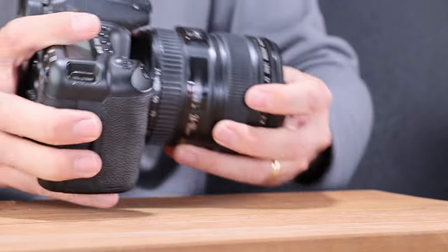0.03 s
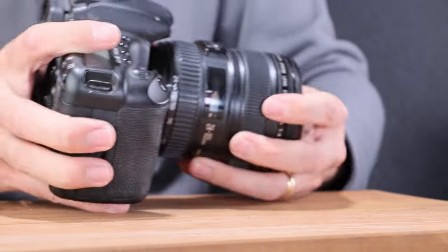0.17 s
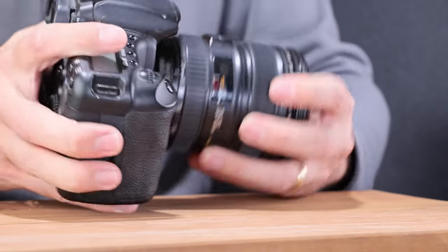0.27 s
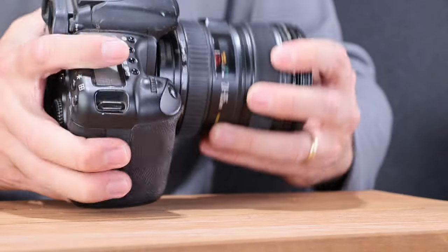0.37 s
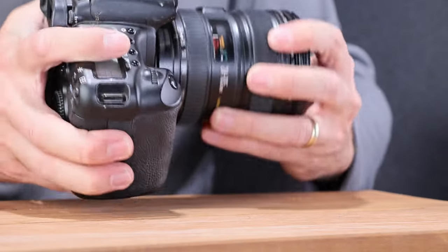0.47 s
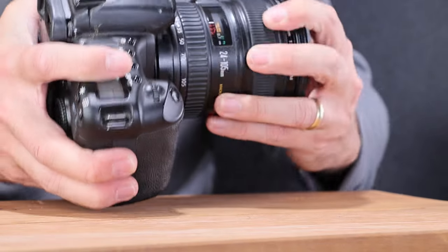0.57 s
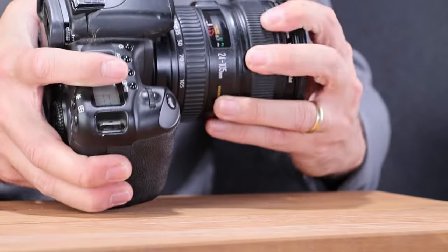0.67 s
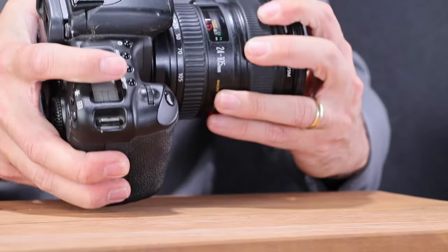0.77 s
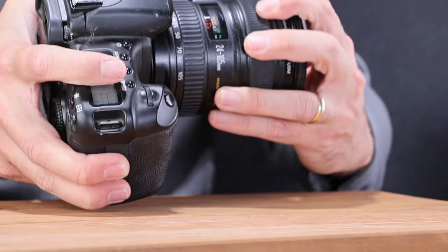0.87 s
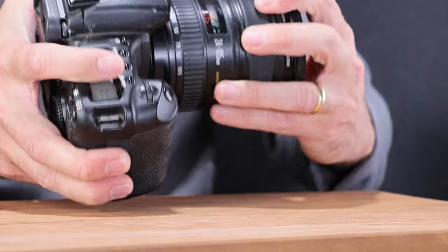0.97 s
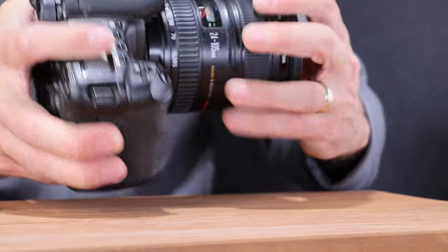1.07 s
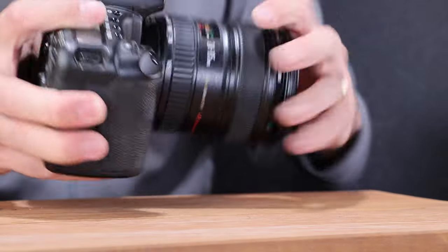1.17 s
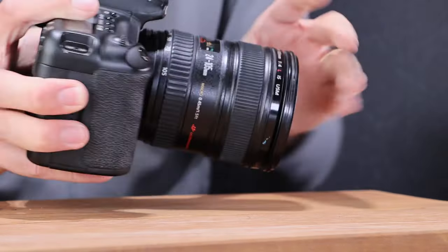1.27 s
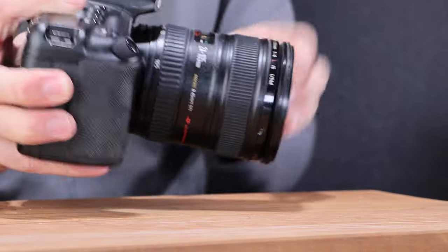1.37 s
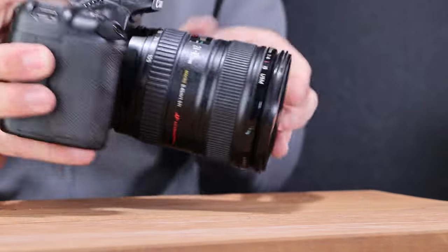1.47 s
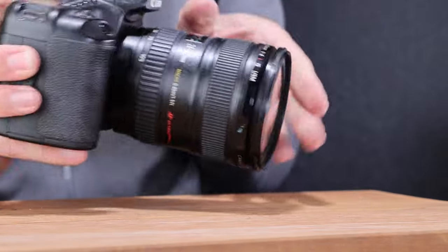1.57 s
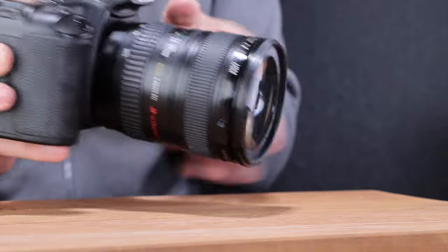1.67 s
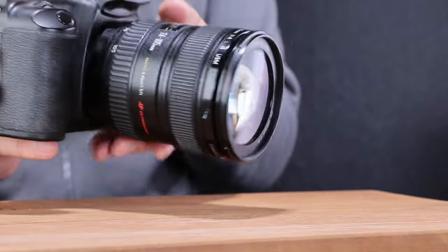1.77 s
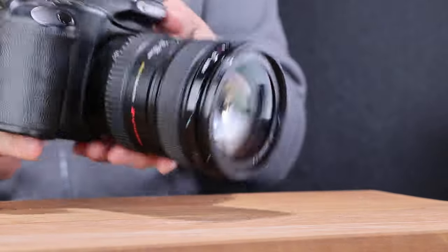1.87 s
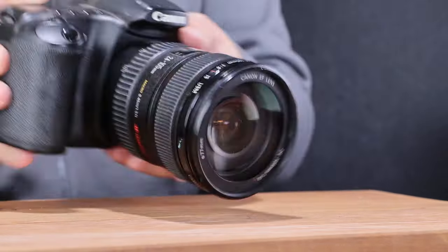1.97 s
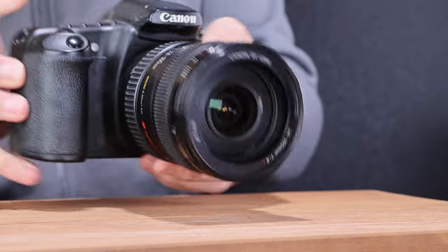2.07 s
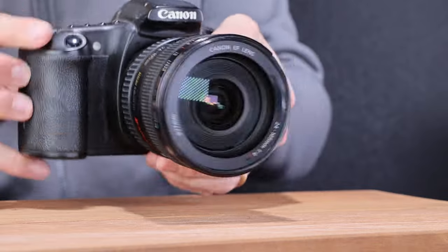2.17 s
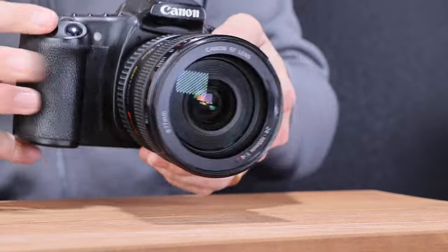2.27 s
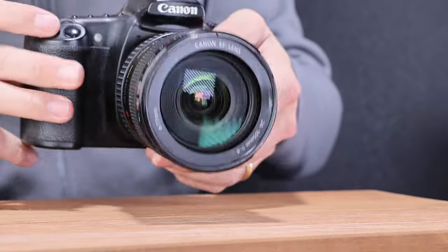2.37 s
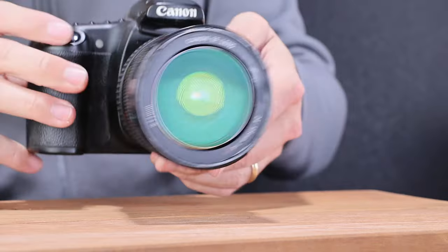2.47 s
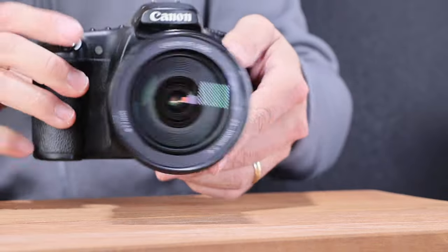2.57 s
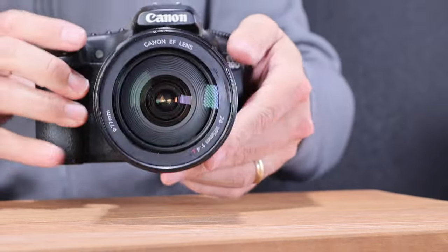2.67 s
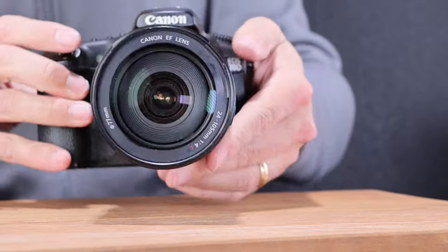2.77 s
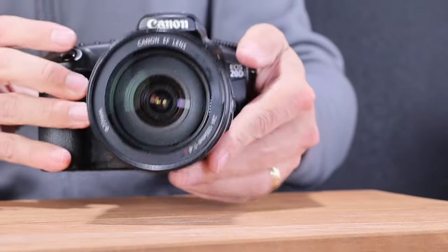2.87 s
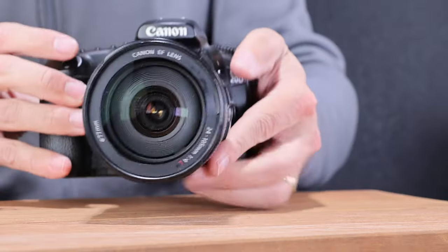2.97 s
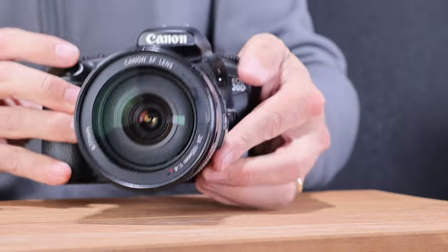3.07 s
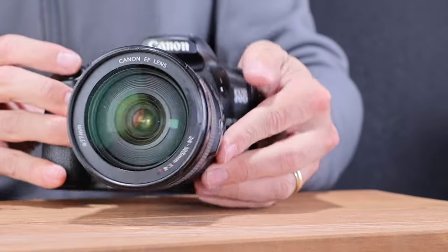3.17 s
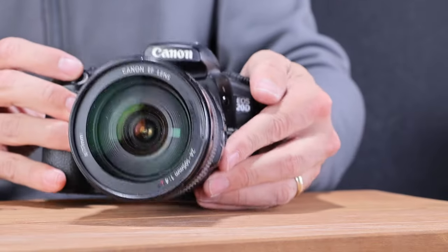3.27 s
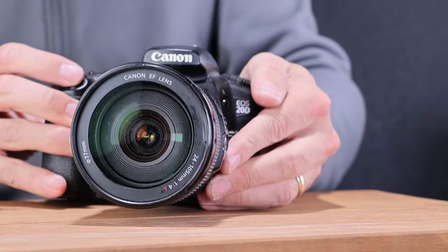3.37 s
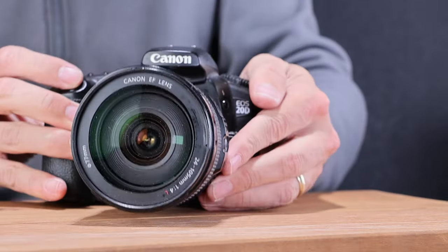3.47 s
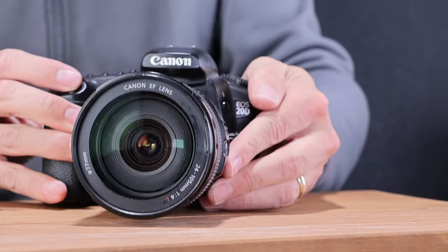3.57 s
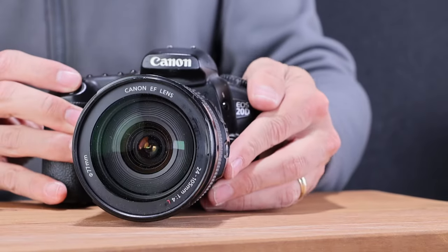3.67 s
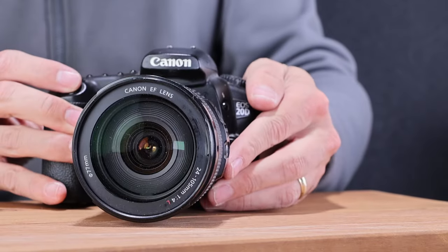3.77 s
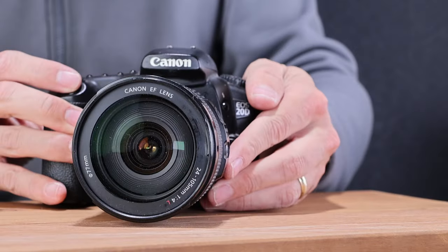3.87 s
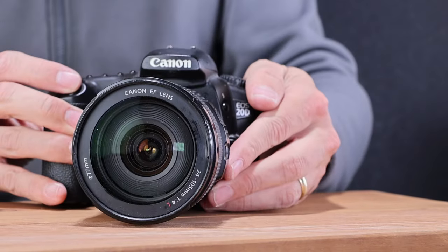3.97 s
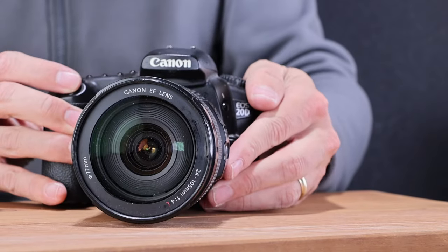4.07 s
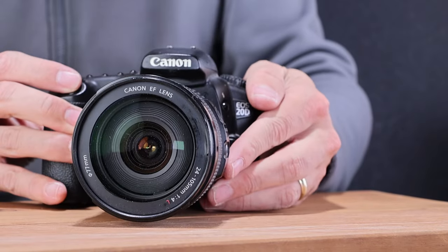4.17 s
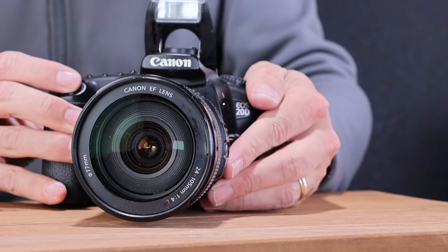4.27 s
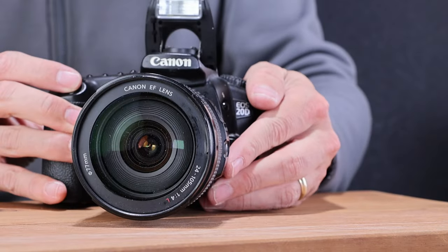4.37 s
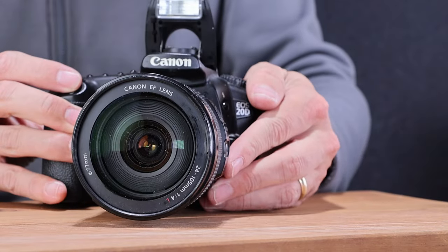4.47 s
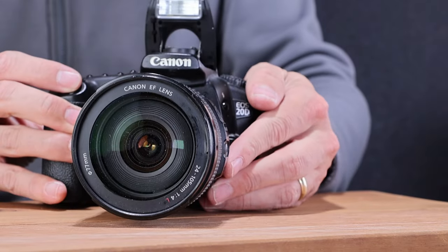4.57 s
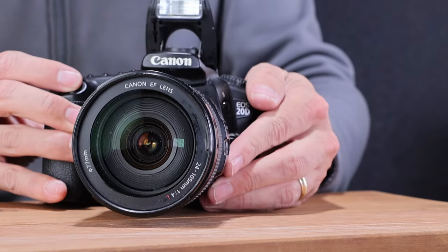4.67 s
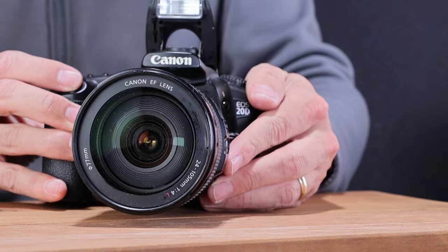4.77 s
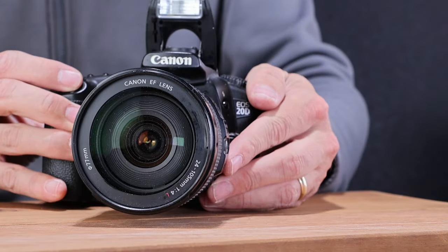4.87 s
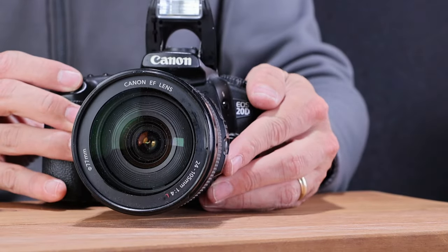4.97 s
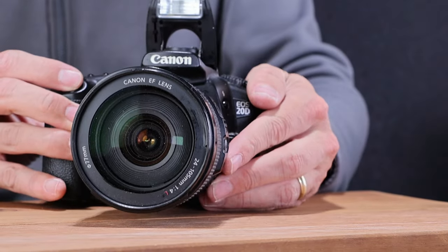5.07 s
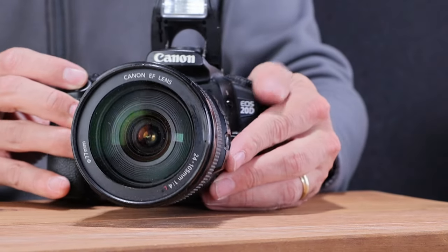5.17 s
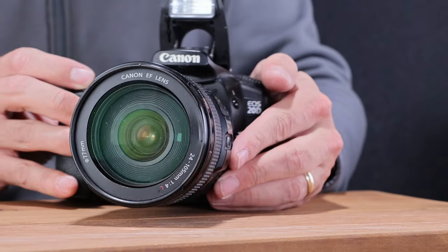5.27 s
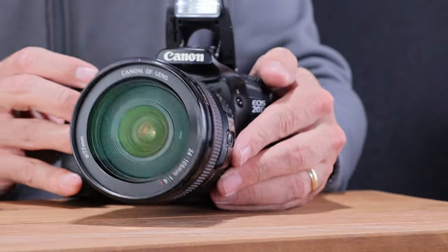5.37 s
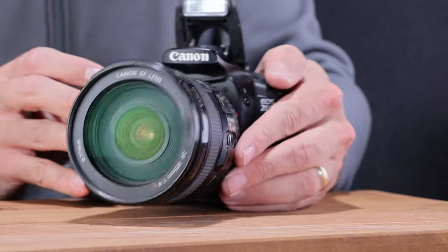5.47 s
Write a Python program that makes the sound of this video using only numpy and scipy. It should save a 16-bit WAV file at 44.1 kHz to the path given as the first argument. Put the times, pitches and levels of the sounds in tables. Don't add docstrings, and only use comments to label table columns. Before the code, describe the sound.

Soft finger rubs and dry plastic ticks come first, then a dull thump cluster and one loud sharp click. Light handling continues, with a two-part switch click, two woody table bumps as the camera lands, a quick ratcheting whir and a very sharp snap of the flash arm with a table jolt. Quiet fan hum throughout, close nearly mono microphone, short indoor reverberation.

```python
import sys
import numpy as np
from scipy import signal
from scipy.fft import rfft, irfft
from scipy.io import wavfile
from scipy.ndimage import uniform_filter1d

SR = 44100
rng = np.random.default_rng(int(sys.argv[2]) if len(sys.argv) > 2 else 0)


def generate_wav(sig):
    pcm = np.round(np.clip(np.atleast_2d(sig).T, -1, 1) * 32767).astype(np.int16)
    wavfile.write(sys.argv[1], SR, pcm)


def gain_from_db(level_db):
    decades = np.asarray(level_db, float) / 20
    return 10 ** decades


N = 244112
LEAD = 2205
BINS = 2048
BIN_HZ = np.arange(BINS + 1) * SR / (2 * BINS)
STOP_S = 4.4024
ONSET_S = .0006


def evened(x):
    return x / np.sqrt(np.mean(x ** 2) + 1e-20)


def read(points, hz):
    f, value = np.transpose(points)
    return np.interp(np.log(hz + 1), np.log(f + 1), value)


def add(mix, s, sound):
    part = mix[LEAD + round(s * SR):][:len(sound)]
    part += sound[:len(part)]


def coloured(x, points, tilt_db=0):
    hz = np.fft.rfftfreq(len(x), 1 / SR)
    gain = gain_from_db(read(points, hz) + tilt_db * np.log2(hz / 4000 + 0.043))
    return evened(irfft(rfft(x) * gain, len(x)))


def resonate(x, hz, width):
    turn = np.exp(2j * np.pi * hz * np.arange(len(x)) / SR)
    r = np.exp(-np.pi * width / SR)
    return 2 * (turn * signal.lfilter([1 - r], [1, -r], x / turn)).real


def ring(hz, db, t60, rise, length):
    t = np.arange(round(length * SR))[:, None] / SR
    x = (gain_from_db(db - 60 * t / t60) * np.sin(2 * np.pi * hz * t)).sum(1)
    x = x * (1 - np.exp(-t[:, 0] / rise))
    return x / abs(x).max()


def rattle(shape_db, length, bounce=.68):
    circle = np.log(gain_from_db(np.maximum(np.r_[shape_db, shape_db[-2:0:-1]], -100)))
    x = np.fft.ifft(np.exp(np.conj(signal.hilbert(circle)))).real
    for lag in 1 + (rng.uniform(.12, .3, 2) * length * SR).astype(int):
        b = np.r_[-min(bounce, .9), np.zeros(lag - 1), 1]
        x = signal.lfilter(b, b[::-1], x)
    return x / np.linalg.norm(x)


# (f/Hz, level/dB per Hz)
AIR_SPECTRUM = [(12, -52), (20, -11), (65, -8.5), (86, -17.5), (104, -9), (182, -6), (262, -3), (337, -5.5),
                (527, -7.5), (574, -2.5), (1220, -17), (1480, -16), (2200, -22.5), (6360, -27),
                (16000, -29.5)]
# (f/Hz, side minus mid level/dB)
AIR_SIDE_SPECTRUM = [(60, -15.5), (110, -17), (200, -20.5), (380, -20.5), (700, -20.5), (1290, -13.5),
                     (2380, -7.5), (4400, -3.5), (8120, -1.5), (15000, -0.5)]
# (f/Hz, width/Hz, level/dB re air)
DUCT_MODES = [(200, 53, -12), (342, 20, -11), (633, 36, -13.5), (700, 30, -21.5), (6260, 100, -24.5)]


def air(air_db=-63.5, edge_hz=15800, patchy_db=0.65):
    hz = np.fft.rfftfreq(2048, 1 / SR)
    a, b, c, d, patches = rng.standard_normal((N // 512 + 5, 1025, 5)).T
    patches = evened(uniform_filter1d(uniform_filter1d(patches, 20, 0), 8, 1))
    side_gain = gain_from_db(read(AIR_SIDE_SPECTRUM, hz))[:, None]
    z = np.array([a + 1j * b, (c + 1j * d) * side_gain])
    z = z * gain_from_db(read(AIR_SPECTRUM, hz)[:, None] + patchy_db * patches) * (hz < edge_hz)[:, None]
    mid, side = signal.istft(z, nperseg=2048, noverlap=1536)[1][:, :N]
    scale = gain_from_db(air_db) / mid.std()
    wind = rng.standard_normal(N)
    duct = sum(gain_from_db(air_db + db) * evened(resonate(wind, f, width)) for f, width, db in DUCT_MODES)
    return np.array([scale * mid + duct, scale * side])


# (f/Hz, t60/s)
ROOM_T60 = [(100, 0.39), (330, 0.27), (870, .34), (2300, 0.32), (6000, 0.28), (10000, 0.28), (15000, 0.16)]
# (t/s, level/dB)
NEAR_ECHOES = [(.0025, -19), (.0075, -22.5), (0.009, -19), (0.015, -12.5), (.021, -19)]


def room(x, tail_db=-0.72, side_db=-18.5):
    taps = np.zeros((2, SR // 2))
    at = np.arange(40, SR // 2 - 10, 10) + rng.integers(0, 10, (2, (SR // 2 - 41) // 10))
    np.put_along_axis(taps, at, rng.choice([-1., 1.], at.shape), 1)
    hz, t, z = signal.stft(taps, SR, nperseg=256)
    tail = signal.istft(z * gain_from_db(-60 * t / read(ROOM_T60, hz)[:, None]), SR, nperseg=256)[1]
    tail = tail * (1 - np.exp(-np.arange(tail.shape[1]) / SR / 0.00033))
    tail = gain_from_db(tail_db) * tail / np.linalg.norm(tail[0])
    for s, db in NEAR_ECHOES:
        tail[:, round(s * SR)] += gain_from_db(db)
    return signal.fftconvolve(x[None], tail * gain_from_db(np.array([[0], [side_db]])), axes=1)[:, :len(x)]


# (f/Hz, level/dB per Hz)
KNOCK_SPECTRUM = [(47, -45), (80, -31), (189, -7.5), (446, -6.5), (594, -5.5), (1340, -9), (1570, -13.5),
                  (5750, -14.5), (13000, -28.5), (15500, -37.5)]


def early_knock(near):
    add(near, -.012, gain_from_db(1) * rattle(read(KNOCK_SPECTRUM, BIN_HZ), .004))


# (f/Hz, level/dB per Hz)
RUB_SPECTRUM = [(600, -35.5), (1100, -14), (2300, -11.5), (3800, -7), (4800, -6.5), (5600, -8.5),
                (7500, -13), (14500, -22.5), (16000, -46)]


def rub(s, rise, fall, db, bright_db, lumpy_db=3.5):
    noise, lumps = rng.standard_normal((2, SR // 2))
    t = np.arange(SR // 2) / SR - rise
    grains = noise * gain_from_db(lumpy_db * evened(uniform_filter1d(lumps, 150)))
    share = np.clip(bright_db / 6 + .5, 0, 1)
    x = share * coloured(grains, RUB_SPECTRUM, 4.6) + (1 - share) * coloured(grains, RUB_SPECTRUM, -9.0)
    away = np.where(t < 0, -t / rise, t / fall)
    speed = gain_from_db(db - 14 * away)
    return s - rise, speed * x * np.clip(8 * (1 - away * (t < 0)), 0, 1)


# (t/s of fastest slide, speeding up/s, slowing down/s, level/dB, brightness/dB per octave)
FINGER_STROKES = [(.45, .14, 0.089, -62, -0.2), (.66, .08, 0.07, -61, -0.8), (1.26, .1, .12, -75, 6),
                  (1.529, 0.053, 0.03, -59, 1.5), (1.6, .05, .1, -82, 5), (2.0, .07, 0.12, -63.5, 0.3),
                  (2.15, .1, 0.054, -65, -0.3), (2.25, .1, 0.09, -78, -4), (2.62, .08, 0.12, -73, 1.5),
                  (3.05, .15, .3, -91, -3), (3.551, 0.17, 0.17, -87, -3), (3.84, .1, 0.08, -72.5, -1.5),
                  (4.05, .06, 0.086, -67, -2.4), (5.36, .1, 0.17, -68, -3.5),
                  (5.535, .07, .03, -65.5, -1.5)]


def finger_strokes(near):
    for row in FINGER_STROKES:
        add(near, *rub(*row))


# (f/Hz, level/dB, t60/s)
SHELL_MODES = [(462, -15, 0.017), (620, .5, 0.023), (674, 2.5, 0.045), (793, -9.5, 0.015),
               (961, -5.5, 0.045), (1327, 0, 0.028), (1500, -7, 0.017)]


def body(db, pitch=1):
    hz, level_db, t60 = np.transpose(SHELL_MODES)
    hz = hz * pitch * rng.uniform(0.95, 1.03, len(hz))
    return gain_from_db(db) * ring(hz, level_db, t60, 0.0014, BINS * 2 / SR)


def click(db, hz, spread, length, body_db, modes_db=4.0):
    shape_db = -6 * (np.log2((BIN_HZ + 50) / hz) / max(spread, .3)) ** 2
    ripple = evened(uniform_filter1d(uniform_filter1d(rng.standard_normal(BINS + 1), 40), 40))
    part = rattle(shape_db + modes_db * ripple, length)
    return gain_from_db(db + 14.5) * (part + 0.36 * body(body_db))


# (t/s, peak level/dB, centre f/Hz)
SKIN_TICKS = [(0.159, -51, 4900), (0.774, -58, 3800), (0.8864, -57.5, 4310), (1.014, -47, 4000),
              (1.5914, -56, 7250), (1.639, -55.5, 4230), (1.7754, -53, 4550), (2.011, -57, 4600),
              (2.106, -54, 5280), (2.166, -60, 4700), (2.3094, -61, 6260), (2.602, -62, 5080)]


def skin_ticks(near):
    for s, db, hz in SKIN_TICKS:
        add(near, s + ONSET_S, click(db, hz, spread=0.92, length=.0019, body_db=-10))


# (t/s, peak level/dB, centre f/Hz, spread/octaves, body level/dB re click)
PART_CLICKS = [(0.2453, -52, 3400, 1, -8), (0.4434, -52, 3280, 0.66, -23), (0.4848, -43, 3440, 0.8, -26),
               (1.282, -44.5, 1540, 0.56, -18), (1.489, -42, 6500, 0.85, -11.5),
               (1.5519, -42.5, 4260, 1, -19), (1.8826, -56, 2580, 1.5, -6), (1.9021, -49, 2760, 1, -4),
               (2.0572, -47, 4770, 0.5, -18), (2.063, -48.5, 5150, 0.52, -16), (2.393, -46, 3480, 0.7, -16),
               (2.4583, -52, 4750, 0.62, -5), (2.4664, -56, 1670, 0.68, -14),
               (3.6944, -55, 1500, 1.2, -3.5), (3.7314, -43.5, 3240, 1.23, -14),
               (3.7355, -48, 4500, 1.2, -10.5), (3.8876, -56, 1630, 1.07, -1),
               (5.3627, -49.5, 3710, 0.79, -6), (5.521, -56.5, 1530, 1.46, -1)]


def part_clicks(facing, spread):
    for s, db, hz, octaves, body_db in PART_CLICKS:
        tap = click(db, hz, octaves, .0015, body_db)
        add(facing, s + ONSET_S, tap)
        add(spread, s + ONSET_S, gain_from_db(-2.5) * tap)


# (f as multiple of main pitch, level/dB, t60/s)
TABLE_MODES = [(.45, -25, 0.13), (.85, -9, 0.12), (1.0, -2, 0.14), (1.14, -10, 0.2), (1.42, -2.5, 0.075),
               (1.65, -4, 0.064), (2.4, -9.5, 0.088), (3.6, -18, 0.013)]


def thump(db, hz, ring_factor):
    factor, level_db, t60 = np.transpose(TABLE_MODES)
    contact_s = max(0.00099 + .0004 * (-31 - db), .0005)
    return gain_from_db(db) * ring(hz * factor, level_db, t60 * ring_factor, contact_s, .25)


# (f/Hz, level/dB, t60/s, delay/s, swell/s)
SLAB_MODES = [(102, -10.5, 0.16, .001, .004), (172, .5, .26, .0005, .003), (207.5, 1.3, .15, .034, .008),
              (239, 4.5, .075, .0002, .001), (287.7, -5.5, 0.16, .02, 0.0054), (340, -9, .12, .0002, .002),
              (400, -12, .07, .0002, .002), (616, -11.5, 0.034, .0002, .001)]


def landing(db, hard_db, ring_factor):
    hz, level_db, t60, delay, swell = np.transpose(SLAB_MODES)
    t = np.arange(SR // 4)[:, None] / SR
    u = np.maximum(t - delay, 0)
    level_db = level_db + hard_db * np.log2(hz / 200)
    x = gain_from_db(level_db - 60 * u / (t60 * ring_factor)) * (1 - np.exp(-u / swell))
    x = (x * np.sin(2 * np.pi * hz * t)).sum(1)
    return gain_from_db(db) * x / abs(x).max()


# (t/s, peak level/dB, main f/Hz, ring time factor)
DULL_BLOWS = [
    (.8015, -46.5, 148, 0.46),
    (0.811, -37.5, 110, 1.04),
    (0.8346, -39.5, 160.4, 0.78),
    (0.862, -45, 149.6, 1.2),
    (2.181, -49, 135, 1.6),
    (3.901, -53.5, 200, 1.4),
    (5.375, -56, 186, 0.9),
    (5.412, -49.5, 184.5, 2.6),
]
# (t/s, peak level/dB, hardness/dB per octave, ring time factor)
TABLE_LANDINGS = [
    (3.4575, -35, 1.5, 0.77),
    (3.579, -36.5, -3, 0.89),
    (4.4113, -34.5, 1, 1.2),
]


def table_blows(facing, spread):
    blows = [(s, thump(*how)) for s, *how in DULL_BLOWS]
    blows += [(s, landing(*how)) for s, *how in TABLE_LANDINGS]
    for s, blow in blows:
        add(facing, s, blow)
        add(spread, s, gain_from_db(-14.5) * blow)


def snap(colour, db, length, body_db, pitch):
    shape_db = read(colour, BIN_HZ)
    shell = body(body_db, pitch)
    blurred_db = 10 * np.log10(uniform_filter1d(gain_from_db(shape_db) ** 2, 50))
    direct = gain_from_db(db) * (rattle(shape_db, length) + shell)
    return direct, gain_from_db(db - 3.5) * (rattle(blurred_db, length) + shell)


# (f/Hz, level/dB per Hz)
MOUNT_SEATING = [(180, -49.5), (300, -2), (828, -6.5), (2790, -14.5), (4670, -22), (5250, -25), (6520, -22),
                 (8220, -28), (16000, -37)]
LOCK_PIN = [(500, -9), (900, -14), (2200, -7), (3400, 1.5), (4300, 5), (5600, 4.5), (7000, -5.5),
            (10500, -9), (14000, -11), (16500, -25.5)]
SWITCH_LEAVING = [(470, -35), (800, -35), (1500, -11), (3400, -3), (4030, -9), (4680, -4), (5310, -8),
                  (6330, 0.5), (9220, -15.5), (11100, -16), (16000, -26.5)]
SWITCH_DROPPING = [(470, -32), (800, -4.5), (1520, -16), (2410, 0.5), (3650, -10.5), (4510, -2.5),
                   (5110, -5.5), (7640, -14), (8660, -8), (9570, -21), (16000, -35)]
ARM_REBOUND = [(900, -30.5), (2600, -16.5), (4900, -14), (5900, -23), (7050, -3.5), (8200, -3.5),
               (9100, -6), (11500, -11), (16000, -29)]
BUTTON_RELEASE = [(470, -54), (800, -20), (2770, -12), (5180, -1), (6740, -10.5), (8550, -24), (14500, -36),
                  (15400, -39), (16000, -62)]
# (t/s, level/dB, rattle length/s, body level/dB re snap, body pitch factor)
LATCH_SNAPS = [
    (0.8005, -22.5, 0.0013, -24.5, 1.52),
    (0.9215, -7, 0.00094, -33, 0.98),
    (2.6871, -19, .002, -21.5, 1.01),
    (2.7434, -19.5, 0.0011, -26, 0.964),
    (4.4126, -6, .0008, -18, 1.0),
    (4.948, -24.5, 0.00097, -34, 0.99),
]


def latch_snaps(facing, spread):
    colours = [MOUNT_SEATING, LOCK_PIN, SWITCH_LEAVING, SWITCH_DROPPING, ARM_REBOUND, BUTTON_RELEASE]
    for colour, (s, *how) in zip(colours, LATCH_SNAPS):
        direct, around = snap(colour, *how)
        add(facing, s, direct)
        add(spread, s, around)


# (t/s, peak level/dB, centre f/Hz)
CAM_STEPS = [
    (4.1604, -48.5, 2960),
    (4.199, -53, 3950),
    (4.2434, -37.5, 3970),
    (4.2504, -36, 3780),
    (4.344, -35.5, 2580),
    (4.3694, -53, 4670),
]


def cam_steps(near):
    for s, db, hz in CAM_STEPS:
        add(near, s + ONSET_S, click(db, hz, spread=1.1, length=.0016, body_db=-21))


# (f/Hz, width/Hz, level/dB)
HOUSING_MODES = [(1040, 120, -3), (1400, 150, -1.5), (2570, 250, -1.5), (2950, 200, -3), (4450, 220, -4.5),
                 (7250, 250, -16.5), (9280, 200, -13)]
# (f/Hz, level/dB per Hz)
GEAR_SPECTRUM = [(240, -61.5), (400, -39.5), (673, -6), (1130, -2), (1540, -3.5), (1990, -11.5),
                 (2550, -2.5), (10400, -17.5), (15500, -37.5)]
# (start t/s, length/s, whirr level/dB, change over the stage/dB)
MOTOR_STAGES = [
    (4.16, .07, -46, -17.5),
    (4.238, .1, -47, -1),
    (4.34, .059, -42.5, -3.5),
]


def motor(wash=0.58, whine_hz=3950, teeth_per_s=490):
    t = np.arange(MOTOR_STAGES[0][0], STOP_S - .003, 1 / SR)
    n = len(t)
    teeth = rng.standard_normal(n) * (0.32 + (rng.random(n) < teeth_per_s / SR) * 3.3)
    housing = sum(gain_from_db(db) * evened(resonate(teeth, hz, width)) for hz, width, db in HOUSING_MODES)
    whirr = wash * coloured(teeth, GEAR_SPECTRUM) + 0.42 * evened(housing)
    load = np.zeros(n)
    for s, length, db, change_db in MOTOR_STAGES:
        load += gain_from_db(db + change_db * (t - s) / length) * (t >= s) * (t < s + length)
    waver = 1 + .0015 * evened(uniform_filter1d(rng.standard_normal(n), 600))
    whine = np.sqrt(2) * np.sin(2 * np.pi * np.cumsum(whine_hz * waver) / SR)
    whine = whine * gain_from_db(1.2 * evened(uniform_filter1d(rng.standard_normal(n), 200)))
    u = (t - 4.213) / 0.14
    spin = gain_from_db(-56.5 - 1.5 * u) * np.clip(12 * u, 0, 1) * np.clip(6 * (1 - u), 0, 1)
    x = gain_from_db(-5.5) * uniform_filter1d(load, size=130) * whirr + spin * whine
    return t[0], x * signal.windows.tukey(n, .02)


# (f/Hz, level/dB per Hz)
FLASH_SPECTRUM = [(600, -34), (1500, -8.5), (2600, -5.5), (3300, -1), (4000, -6.5), (4800, 1), (6300, -3),
                  (7800, -4.5), (9000, -18), (10300, -16.5), (11500, -14), (16000, -34.5)]
CHATTER_TOUCHES = [1.0, 0.25, .9, 1, 0.42, .2]


def flash(db=5, room_db=-1.5, chatter_hz=3175):
    shape_db, touches = read(FLASH_SPECTRUM, BIN_HZ), np.zeros(200)
    at = np.round(np.arange(len(CHATTER_TOUCHES)) * SR / chatter_hz).astype(int)
    touches[at] = CHATTER_TOUCHES
    burst = np.convolve(rattle(shape_db, .0003, bounce=.3), touches)
    direct = gain_from_db(db) * burst / np.linalg.norm(burst)
    return direct, gain_from_db(db + room_db) * rattle(shape_db, .002)


def scene():
    near, facing, spread = np.zeros((3, N + LEAD))
    early_knock(near)
    finger_strokes(near)
    skin_ticks(near)
    part_clicks(facing, spread)
    table_blows(facing, spread)
    latch_snaps(facing, spread)
    cam_steps(near)
    add(near, *motor())
    for mix, sound in zip((facing, spread), flash()):
        add(mix, STOP_S, sound)
    mid, side = room(near + spread)
    small = signal.butter(2, 65, "high", fs=SR, output="sos")
    mid, side = signal.sosfilt(small, [mid + near + facing, side])[:, LEAD:] + air()
    side = side - .012 * mid
    return np.array([mid + side, mid - side])


def low_pass(x):
    return signal.sosfilt(signal.butter(12, 16640, fs=SR, output="sos"), x)


def record(dry):
    return low_pass(dry)


dry = scene()
out = record(dry)
generate_wav(out)
```